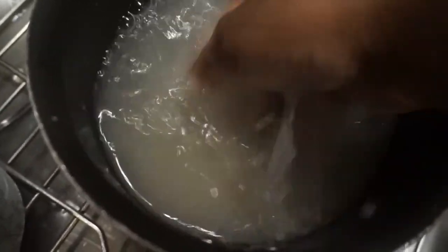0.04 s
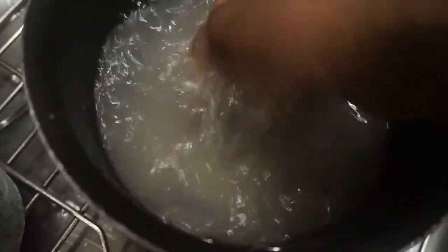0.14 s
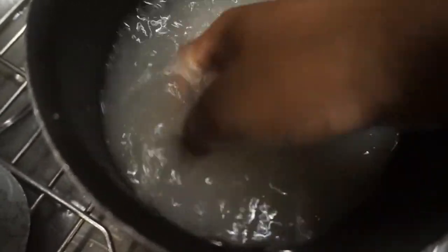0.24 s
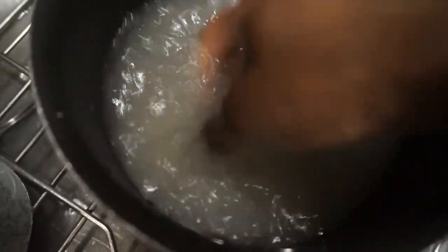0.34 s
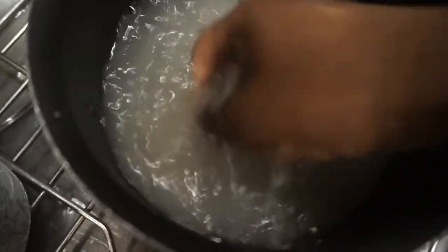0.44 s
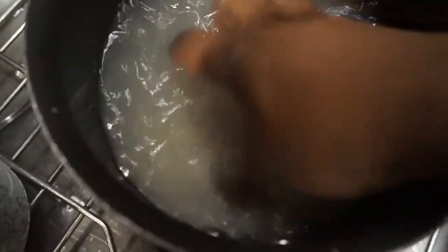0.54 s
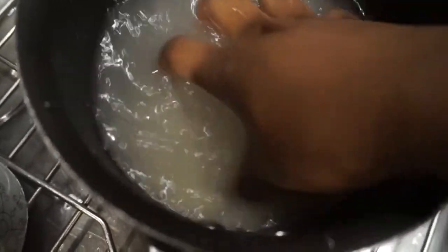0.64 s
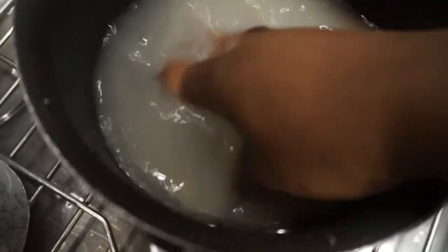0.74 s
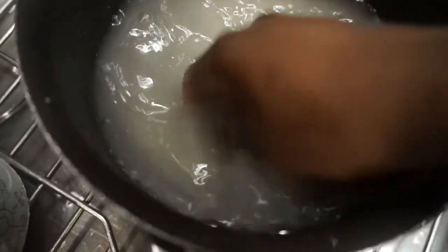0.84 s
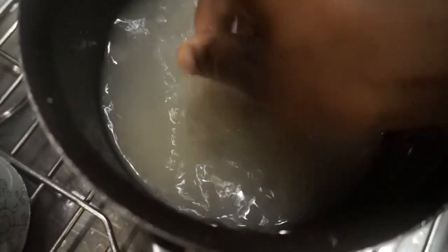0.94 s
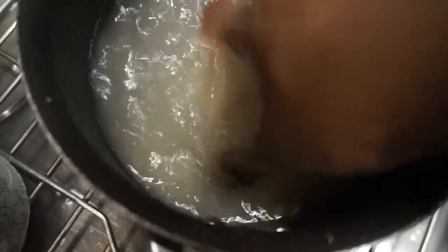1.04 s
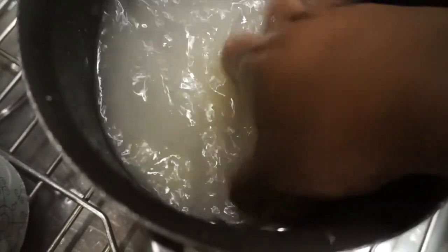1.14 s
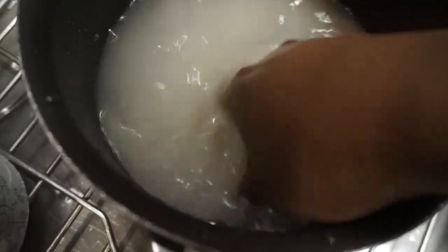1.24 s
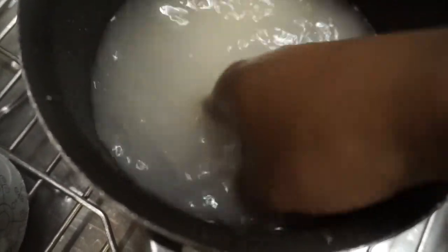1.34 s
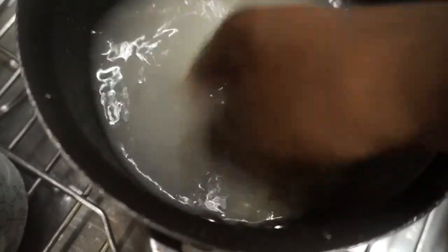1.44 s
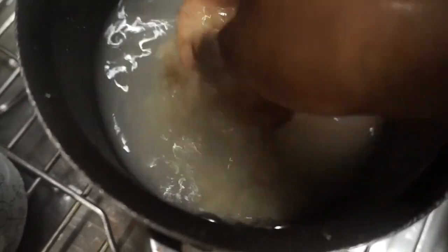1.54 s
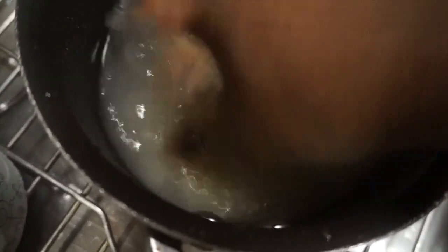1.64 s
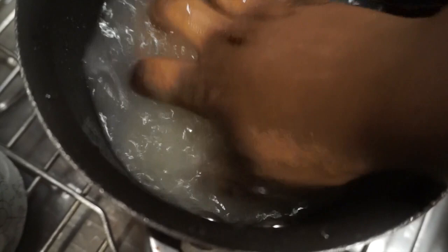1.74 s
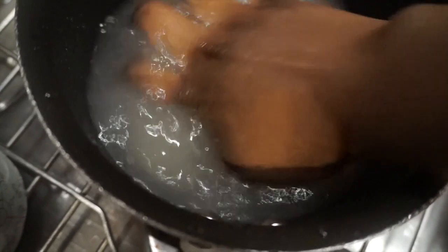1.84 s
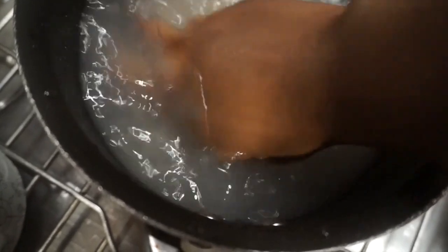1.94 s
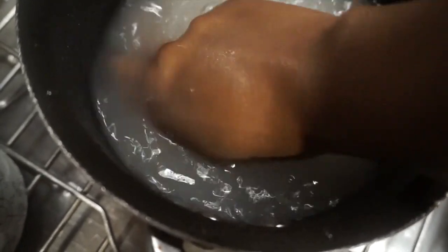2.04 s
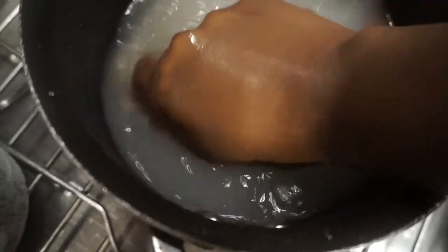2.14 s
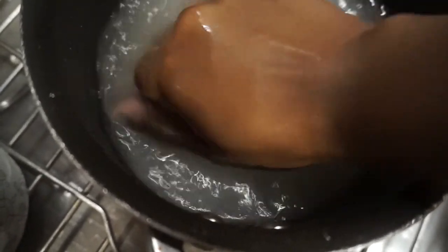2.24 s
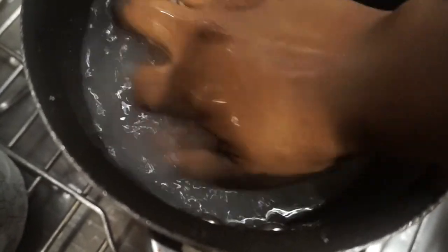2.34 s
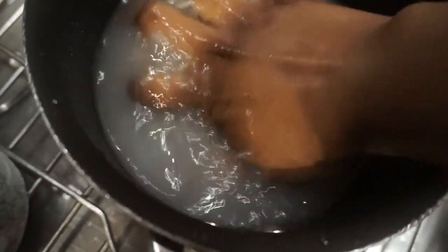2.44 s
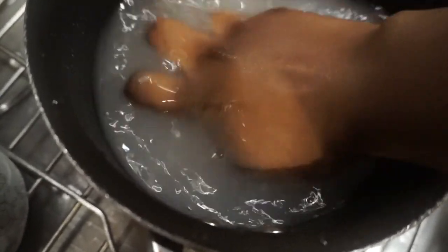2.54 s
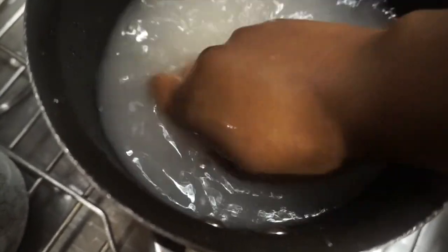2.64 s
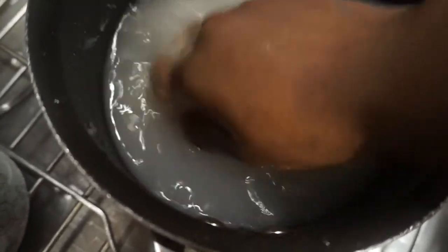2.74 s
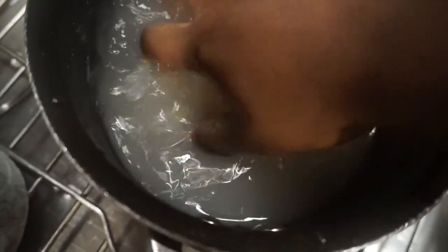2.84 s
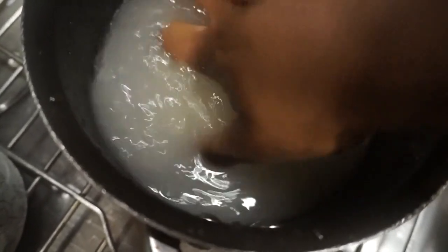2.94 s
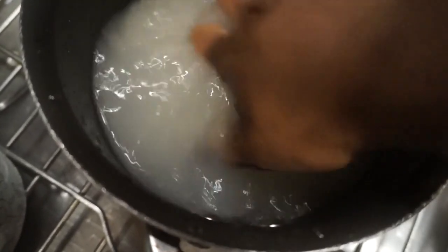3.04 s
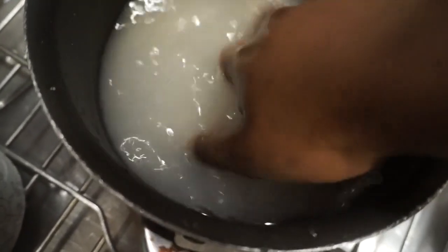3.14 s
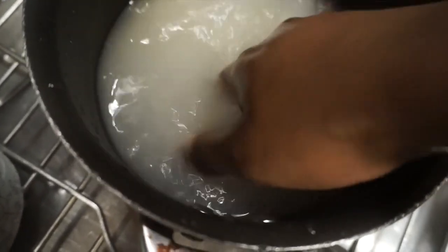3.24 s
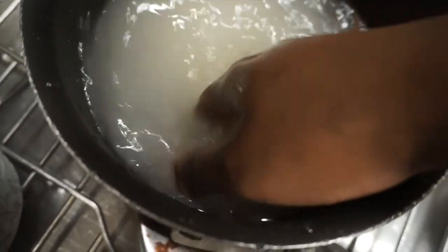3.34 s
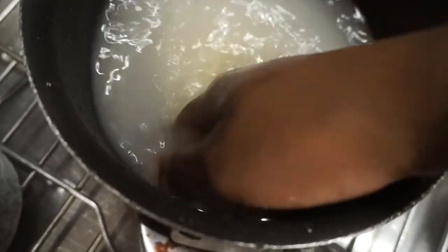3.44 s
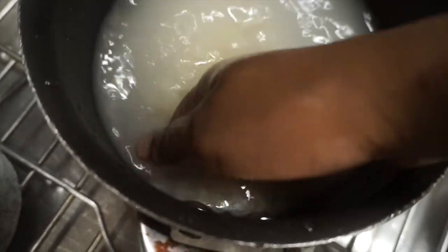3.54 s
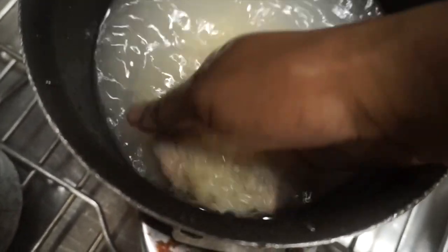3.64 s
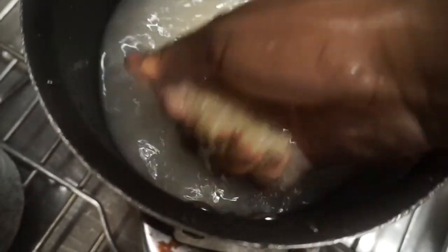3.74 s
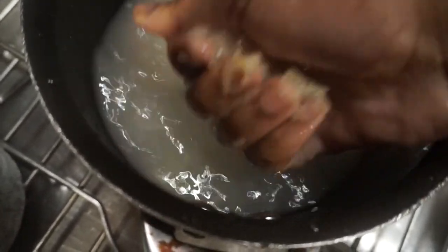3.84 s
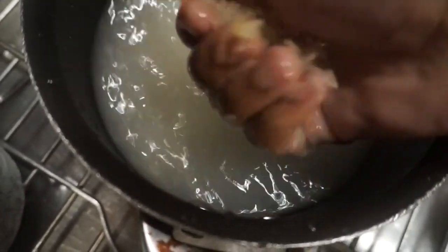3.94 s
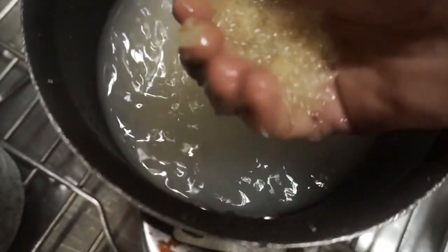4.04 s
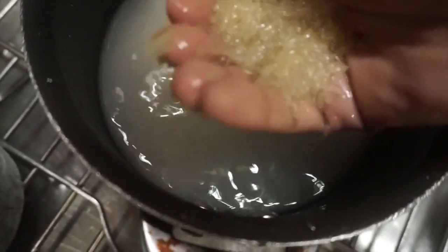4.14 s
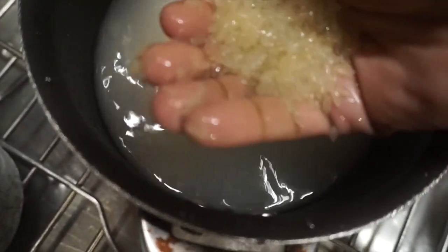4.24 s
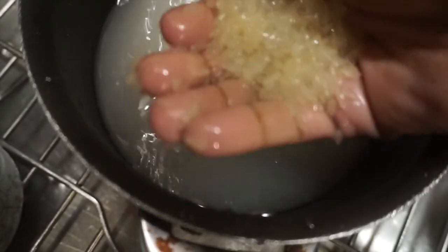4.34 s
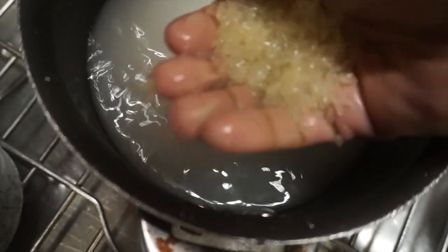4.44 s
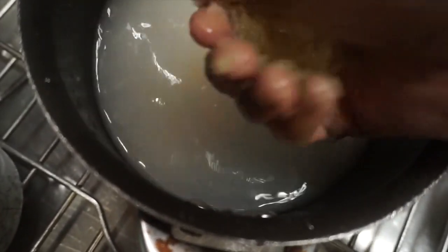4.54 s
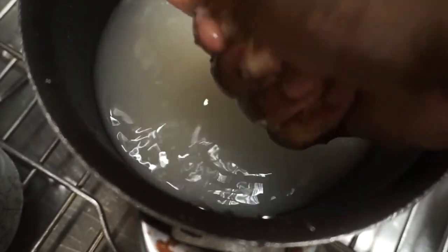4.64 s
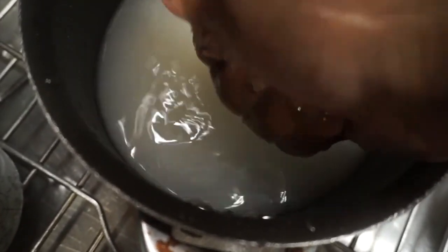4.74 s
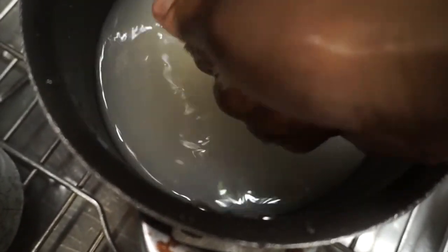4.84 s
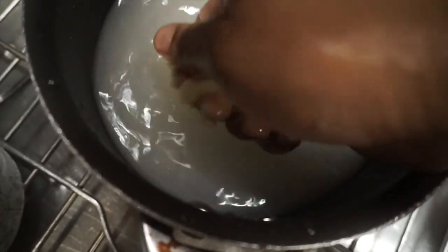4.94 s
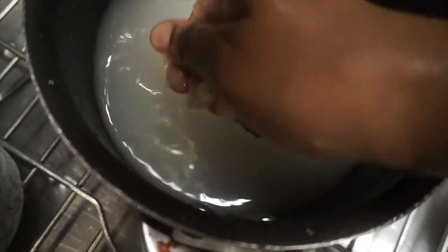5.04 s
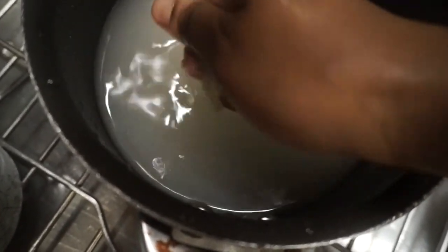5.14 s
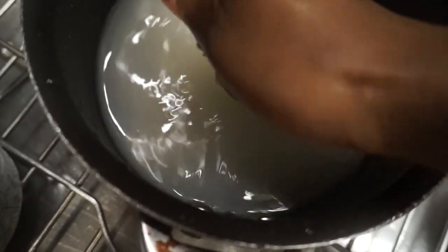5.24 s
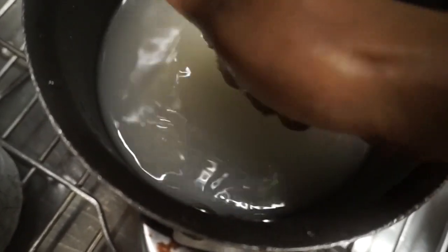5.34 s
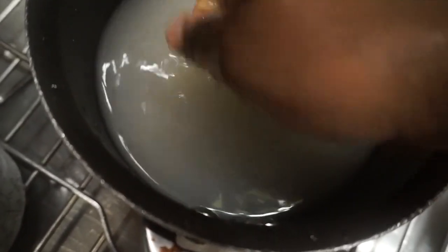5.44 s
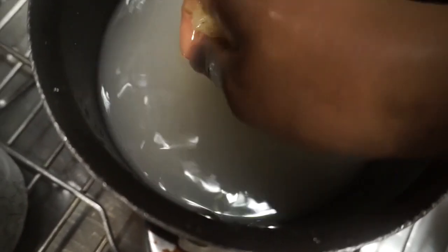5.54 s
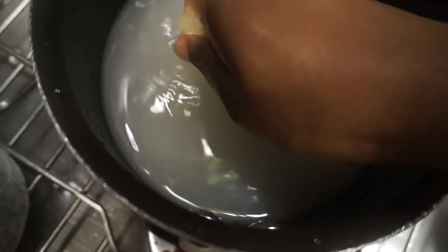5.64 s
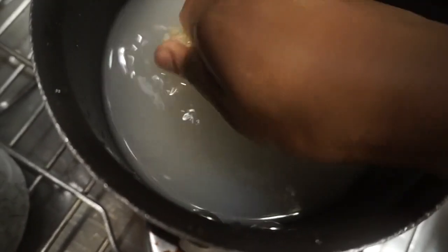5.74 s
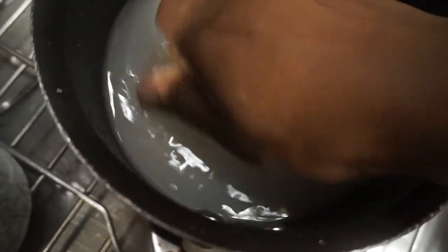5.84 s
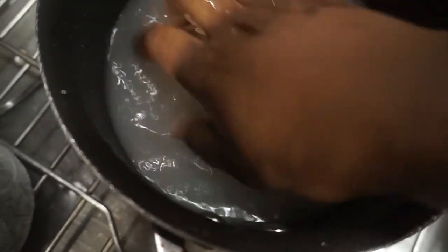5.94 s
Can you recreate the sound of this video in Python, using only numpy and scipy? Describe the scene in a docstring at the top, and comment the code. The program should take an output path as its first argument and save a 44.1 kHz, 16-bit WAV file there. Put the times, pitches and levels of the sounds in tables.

```python
"""Washing rice in a metal pot

A quiet kitchen with faint air and hum; a phone with two microphones sits close to a pot of water.
A hand drops water in plops (bubbles and spray); strokes grind grains, churn water and ring the pot.
Filtered noise and a low boom make the soft thuds of the hand; wet films snap in short noise ticks.
Then a handful is lifted, drips back and is rubbed gently between the fingers."""
import sys
import numpy as np
from scipy import signal
from scipy.fft import rfft, irfft, next_fast_len
from scipy.io import wavfile

SR = 44100
rng = np.random.default_rng(int(sys.argv[2]) if len(sys.argv) > 2 else 0)


def wav_record(signal):
    """Record a signal, one row per channel, as 16-bit PCM in the file named by sys.argv[1]."""
    frames = np.transpose(np.atleast_2d(signal))
    bounded = np.clip(frames, -1, 1)
    # unit amplitude maps onto the largest positive 16-bit level
    quanta = np.round(bounded * 32767).astype(np.int16)
    wavfile.write(sys.argv[1], SR, quanta)


N = 264143
TIME = np.arange(N) / SR
# padded transform length and its frequencies [Hz]
SIZE = 2 * next_fast_len(N // 2 + SR // 2, True)
FREQ = np.maximum(np.fft.rfftfreq(SIZE, 1 / SR), 1)

# Levels in the tables are relative: each source also has its own gain.
# In every movement, rise and fall are the times from the peak to ARCH_DB below it.

# room air spectrum: (frequency [Hz], level per Hz [dB])
KITCHEN_AIR = [(15, -40.5), (25, -30), (48, -10), (87, -8), (190, 2), (285, -15), (489, -22), (818, -16.5),
               (936, -27.5), (1130, -26), (1260, -27), (4030, -32.5), (16000, -38.5)]
# appliance hum: (frequency [Hz], rms level [dB])
APPLIANCE_HUM = [(118.4, -70), (194, -80.5)]
# hand bumping the bottom: (peak time [s], rise [s], fall [s], level [dB])
BUMPS = [(0.12, 0.18, 0.17, -55), (0.735, 0.033, 0.14, -45), (0.825, 0.072, .12, -47),
         (0.96, 0.071, 0.11, -48), (1.21, 0.069, 0.15, -50), (1.85, 0.11, 0.75, -59.5),
         (2.68, 0.053, 0.09, -50.5), (3.15, 0.037, 0.14, -47), (3.29, 0.12, 0.16, -43.5),
         (3.50, 0.023, 0.038, -53.5), (3.78, 0.069, 0.034, -57.5)]
# soft bump spectrum: (frequency [Hz], level per Hz [dB])
THUD_SPECTRUM = [(40, -22), (75, -6.5), (110, -2.5), (150, 1), (210, 1), (290, -15.5), (400, -12.5),
                 (550, -17), (900, -41.5)]
# palm slapping the water: (time [s], level [dB])
SLAPS = [(0.966, -44), (1.829, -52)]
# slap spectrum: (frequency [Hz], level per Hz [dB])
SLAP_SPECTRUM = [(50, -5.5), (150, -0.5), (380, 14), (520, 5), (900, 1), (2000, -6), (5000, -17)]
# modes of the filled pot: (frequency [Hz], width [Hz], level [dB])
POT_MODES = [(745.4, 5.9, 13.5), (782, 20, 6.5), (1010, 10, -26), (1325, 81, -7.5), (1580, 46, -42.5),
             (2035, 110, -8.5), (2290, 24, -11), (3570, 56, -36)]
# falling water that knocks the pot: (time [s], level [dB])
KNOCKS = [(1.815, -54), (2.476, -39.5), (4.12, -51), (4.22, -31.5), (4.525, -44)]
# short pot tones as the hand drags rice: (peak time [s], rise [s], fall [s], frequency [Hz], level [dB])
POT_TONES = [(0.59, .015, 0.032, 775, -44), (0.68, 0.0086, 0.038, 758, -41), (0.79, 0.019, .025, 1340, -47),
             (0.807, 0.03, 0.047, 753, -26.5), (0.844, 0.028, 0.022, 740, -35),
             (0.93, 0.017, 0.016, 750, -51), (1.16, 0.009, 0.019, 783, -30.5),
             (1.19, 0.014, 0.021, 780, -38), (1.25, 0.044, 0.064, 749, -36.5), (1.28, .06, 0.1, 1310, -46),
             (1.36, 0.041, 0.065, 766, -48), (2.61, 0.027, 0.024, 740, -47.5),
             (2.70, 0.039, 0.042, 745, -42), (2.848, 0.013, 0.027, 806, -43),
             (2.89, 0.018, 0.052, 785, -42), (3.14, 0.018, 0.019, 780, -54),
             (3.205, 0.015, 0.023, 775, -50), (3.25, .015, 0.02, 800, -43), (3.262, 0.08, 0.019, 1308, -39),
             (3.29, 0.011, .02, 750, -43), (3.345, 0.021, .04, 785, -43), (3.42, 0.013, 0.034, 795, -44),
             (3.49, .03, 0.029, 805, -50)]
# air between palm, water and wall: (frequency [Hz], width [Hz], level [dB])
CAVITY_MODES = [(1096, 67, -7.5), (1277, 100, 4), (1570, 40, -4.5), (1840, 70, -8), (2120, 120, -1),
                (2320, 90, -2)]
# hollow of the closing hand: (peak time [s], rise [s], fall [s], frequency [Hz], width [Hz], level [dB])
HAND_HOLLOWS = [(0.80, 0.047, 0.014, 2410, 500, -46), (1.30, 0.019, 0.083, 2410, 395, -47),
                (3.22, 0.077, 0.059, 2200, 506, -55.5), (5.115, 0.061, 0.084, 2050, 204, -65.5),
                (5.24, 0.017, 0.025, 3180, 404, -62), (5.30, 0.048, .04, 2190, 170, -67),
                (5.70, .05, 0.047, 2930, 329.3, -49), (5.975, 0.056, .04, 2260, 400, -50)]
# presses of the fist: (peak time [s], rise [s], fall [s], level [dB])
FIST_PRESSES = [(5.715, 0.027, 0.047, -58), (5.98, 0.018, .03, -54)]
# soft body of rice in the palm: (frequency [Hz], level per Hz [dB])
KNEAD_SPECTRUM = [(400, -8), (750, -3), (1200, -6), (1800, -13), (3500, -30)]
# films snapping between the fingers: (time [s], level [dB], extra top treble [dB])
FILM_SNAPS = [(0.347, -30.5, -2), (0.411, -39, 8.5), (0.669, -34.5, 7), (0.859, -32, -9),
              (1.017, -44.5, 6.5), (1.096, -33, 1), (1.353, -38, -9), (1.365, -37.5, 4), (1.793, -43, 18.5),
              (1.841, -37, 16), (1.873, -38, 6.5), (1.942, -42, 2), (2.194, -42.5, 3), (2.254, -52.5, 7),
              (2.476, -34, 12.5), (2.646, -54, -5), (2.93, -28, -10), (3.186, -42, 5.5), (3.538, -55.5, 6),
              (3.824, -57, -2), (3.885, -58, 1), (3.893, -46, 2), (4.052, -52, -13), (4.094, -47, -11),
              (4.12, -50, 1), (4.164, -54, -3), (4.298, -56, -13), (4.317, -55.5, -16), (4.383, -55.5, -12),
              (4.453, -67.5, 8), (4.515, -48.5, -2), (4.736, -53.5, 8.5), (4.896, -50, -2),
              (4.915, -56, -4), (4.981, -50.5, -4), (5.036, -52.5, -11), (5.305, -57.5, -9),
              (5.36, -49, -1.5), (5.379, -43.5, -16), (5.411, -49, 6), (5.452, -39, -10), (5.866, -56, -10)]
# strokes through the pot: (peak time [s], rise [s], fall [s], grain rub [dB],
# wet crackle relative to the rub [dB], churned water [dB], scrape on the pot [dB])
STROKES = [(0.02, 0.26, 0.064, -50, -3, -50.5, -52.5), (0.16, 0.11, 0.11, -42, -6.5, -46, -44),
           (0.28, 0.071, 0.072, -38.5, -5, -35, -36.5), (0.44, 0.11, 0.087, -42.5, -9, -49.5, -65),
           (0.62, 0.29, 0.12, -48, -2, -52.5, -47), (0.81, 0.13, 0.11, -45, -12, -53, -42),
           (1.00, 0.41, 0.29, -52, -3.5, -59, -56.5), (1.16, 0.052, 0.043, -43, -5, -52, -51.5),
           (1.27, 0.065, 0.12, -42, -10, -50.5, -47.5), (1.64, 0.15, 0.31, -41, -7, -42.5, -46),
           (1.86, 0.11, 0.12, -56, -16, -49.5, -78), (2.02, 0.15, 1, -61.5, -1, -67, -63.5),
           (2.35, 0.085, 0.89, -56, -10, -73, -93), (2.46, 0.062, 0.01, -51, 8, -39.5, -47),
           (2.68, 0.2, 0.073, -66.5, -20.5, -56.5, -57), (2.845, 0.014, 0.072, -54.5, 7.5, -77, -50.5),
           (2.94, 0.067, 0.05, -49.5, -9, -49, -56), (3.10, 0.05, 0.22, -50, -4.5, -65, -55.5),
           (3.24, 0.26, 0.13, -54, -34, -60, -50), (3.42, 0.23, 0.14, -53, -20, -52, -53.5),
           (3.69, 0.22, 0.13, -59, -11, -63, -64.5), (3.87, 0.064, 0.16, -64.5, -9, -65.5, -96.5)]
# squeezes of the lifted handful: (peak time [s], rise [s], fall [s], grain rub [dB],
# wet crackle relative to the rub [dB])
SQUEEZES = [(4.17, 0.15, 0.1, -69.5, -2), (4.705, 0.014, 0.042, -59, 0.5), (4.97, 0.027, 0.095, -63, -1),
            (5.129, 0.035, 0.12, -56.5, -6.5), (5.317, 0.037, 0.047, -57, -16),
            (5.439, 0.075, 0.12, -56, 0), (5.695, 0.073, 0.084, -42.5, -8), (5.887, 0.031, 0.017, -48, -8),
            (5.968, 0.068, 0.029, -42.5, -2)]
# stirred water spectrum: (frequency [Hz], level per Hz [dB])
WASH_SPECTRUM = [(300, -27), (600, -19.5), (900, -9), (1300, 10), (1700, -3.5), (2400, 5.5), (3500, 1),
                 (7000, -18)]
# rubbing grains spectrum: (frequency [Hz], level per Hz [dB])
RUSTLE_SPECTRUM = [(400, -20), (900, -16), (1700, -26), (2500, -7.5), (3400, -6), (5200, -2), (6600, 3),
                   (7900, -14.5), (11000, -16), (16000, -35)]
# wet film spectrum: (frequency [Hz], level per Hz [dB])
CRACKLE_SPECTRUM = [(2000, -17.5), (5000, 1.5), (6700, 3.5), (8200, 1), (10500, -1), (13000, -1),
                    (16000, -8)]
# water falling or closing over the hand: (time [s], bubble pitch [Hz], bubble level [dB],
# ring time constant [ms], pitch climb [share], spray level [dB])
PLOPS = [(0.096, 668, -41.5, 34, 0.31, -56.5), (0.110, 1430, -27.5, 4.9, -0.18, -27),
         (0.147, 5500, -41, 1.2, 0, -19), (0.153, 3404, -26, 5.9, -0.086, -15.5),
         (0.191, 854, -27, 2.5, 0.0047, -30.5), (0.195, 3780, -19.5, 3.4, 0.04, -27.5),
         (0.230, 1650, -30, 7.7, -0.085, -38), (0.238, 3190, -30, 2.7, -0.026, -28),
         (0.241, 2340, -25.5, 7.7, 0.32, -45), (0.254, 1310, -28, 2.4, 0, -40.5),
         (0.256, 2120, -26.5, 4.1, -0.095, -31), (0.265, 837, -16, 2.5, -0.031, -32.5),
         (0.278, 852, -20.5, 5.2, 0.18, -34), (0.272, 1135, -25, 5.2, 0.022, -34),
         (0.282, 3450, -29, 2.7, 0.14, -20), (0.287, 1170, -23, 3, 0.2, -27.5),
         (0.294, 3600, -31, 2.5, -0.075, -29), (0.3053, 3960, -26, 1.5, 0.035, -23.5),
         (0.319, 4800, -30, 2.5, -0.0029, -21.5), (0.331, 4900, -26.5, 1.2, 0, -25.5),
         (0.329, 2630, -50, 4.2, 0.21, -40.5), (0.3482, 1150, -19, 1.1, 0.15, -25.5),
         (0.368, 906, -11, 3.8, 0.27, -24), (0.380, 1160, -27.5, 5, 0.1, -48),
         (0.411, 4420, -30, 1.7, 0, -35), (0.424, 840, -41, 6.8, 0.18, -25),
         (0.425, 2100, -38.5, 3, 0.023, -37), (0.435, 4694, -37, 2, 0, -24),
         (0.4685, 3250, -20.5, 0.67, -0.24, -30), (0.484, 4700, -31, 2.3, -0.091, -23.5),
         (0.51, 2037, -31.5, 5.1, 0.0044, -44), (0.513, 1010, -29, 4.4, -0.073, -31.5),
         (0.549, 5600, -41, 1.5, 0, -25.5), (0.566, 4730, -35, 3.3, -0.19, -25),
         (0.566, 1130, -36, 1.7, 0.17, -46), (0.597, 2400, -30.5, 0.87, 0.034, -46),
         (0.6526, 2240, -33.5, 6.2, -0.056, -27.5), (0.844, 1370, -38, 6.5, 0.2, -55),
         (0.864, 1056, -42, 8.3, -0.021, -55), (0.968, 6000, -38, 1, 0.054, -23.5),
         (0.972, 1385, -30.5, 0.84, -0.15, -24), (1.008, 6000, -34, 2.2, -0.12, -40),
         (1.094, 1860, -41.5, 5.6, 0, -31), (1.111, 7050, -26, 0.44, 0.094, -30),
         (1.1404, 2590, -21, 1.1, 0.39, -18.5), (1.141, 4750, -33, 2, -0.15, -40),
         (1.161, 3340, -38, 2.2, 0, -31), (1.3668, 5940, -41, 2.2, 0.0052, -48),
         (1.477, 1270, -40, 3.1, 0.13, -27.5), (1.536, 1235, -28, 4.7, 0.23, -38.5),
         (1.538, 2060, -34.5, 2.9, -0.012, -42), (1.561, 3400, -35.5, 1.5, 0, -35),
         (1.569, 1230, -35, 2.8, 0.059, -44.5), (1.569, 6380, -23.5, 0.92, -0.027, -30),
         (1.586, 5168, -33, 2, -0.096, -40.5), (1.600, 6800, -24, 2, 0.035, -30),
         (1.608, 1320, -34, 3.7, 0.088, -32.5), (1.6159, 6900, -13.5, 0.32, -0.067, -23.5),
         (1.626, 2230, -20.5, 1.9, -0.023, -10), (1.629, 1220, -22, 1.7, 0.22, -42),
         (1.657, 2700, -25.5, 2.2, 0.099, -21), (1.659, 1068, -26.5, 8.3, 0.15, -25),
         (1.670, 3830, -26.5, 2.5, -0.085, -32.5), (1.671, 6240, -23, 1.9, 0.16, -13),
         (1.68, 1200, -25, 2.4, .15, -29), (1.693, 3640, -32, 1.6, .05, -34),
         (1.709, 2110, -32.5, 3.6, 0.078, -40.5), (1.725, 4270, -31, 3.8, 0.086, -24.5),
         (1.774, 1623, -30, 5, 0.071, -38), (1.782, 1780, -33, 4.1, 0.16, -43.5),
         (1.789, 3860, -33, 2.5, -0.024, -33.5), (1.7928, 1985, -27, 4.3, 0.17, -31.5),
         (1.805, 3970, -33, 2.3, -0.038, -41.5), (1.816, 730, -35, 5, -0.17, -29.5),
         (1.838, 2305, -15.5, 1.5, 0.31, -14), (1.846, 1265, -28, 2, 0.1, -24),
         (1.849, 2800, -15, 0.65, 0.16, -10.5), (1.873, 1375, -39, 6.7, -0.082, -40.5),
         (1.897, 2110, -39, 4, -0.083, -55), (1.905, 2750, -39, 2.8, .1, -56.5),
         (1.943, 2040, -35, 3.7, 0.075, -36.5), (1.9907, 1490, -30.5, 9.4, 0.28, -26.5),
         (1.996, 2890, -35, 3.6, -0.08, -37.5), (2.002, 2190, -37, 4, -0.08, -37.5),
         (2.0188, 1227, -20, 8.2, -0.079, -24), (2.018, 4310, -31, 1.6, -0.12, -21.5),
         (2.020, 2160, -24, 2.6, 0.16, -39), (2.021, 1605, -21, 3.3, 0.057, -30),
         (2.043, 1210, -30.5, 9.8, -0.03, -34), (2.122, 1910, -44, 2.2, 0, -45),
         (2.141, 1350, -32, 1.7, -0.22, -31), (2.1432, 1900, -26, 1.4, -0.098, -24),
         (2.148, 1674, -29.5, 3.9, 0.16, -36), (2.144, 6670, -27.5, 1.4, -0.00096, -44.5),
         (2.314, 2570, -42.5, 5.2, -0.099, -33.5), (2.406, 1304, -34.5, 7.8, 0.17, -40.5),
         (2.425, 3364, -20, 1.9, -0.056, -31.5), (2.425, 1510, -28.5, 1.5, 0.33, -39.5),
         (2.4498, 1875, -24, 3.9, 0.2, -21.5), (2.450, 2770, -19.5, 0.95, -0.028, -25.5),
         (2.449, 1190, -30.5, 1.5, 0.14, -38), (2.474, 4500, -17, 0.63, -0.25, -16.5),
         (2.472, 3020, -28, 2, -0.085, -30), (2.472, 1170, -27.5, 5.7, 0.062, -45),
         (2.484, 1435, -20, 0.68, 0.24, -21), (2.503, 6300, -36, 1.5, 0, -26.5),
         (2.586, 1310, -45.5, 16, -0.15, -40), (2.666, 1870, -48, 3.6, 0.011, -65),
         (2.731, 4160, -32.5, 1.6, -0.23, -37.5), (2.91, 1780, -36.5, 5.9, 0.061, -32),
         (2.912, 2200, -45, 3.3, 0, -54), (2.93, 1630, -43, 5, -0.13, -48), (2.927, 6640, -67, 2, 0, -29),
         (2.959, 1636, -39, 4.2, -0.3, -58), (3.134, 6720, -35.5, 2.6, -0.099, -48),
         (3.338, 1130, -25.5, 5.7, -0.31, -27.5), (3.355, 2720, -36.5, 3, -0.27, -37),
         (3.4018, 2430, -22, 5.6, -0.034, -24.5), (3.4095, 1420, -30, 4.4, 0.3, -45),
         (3.416, 2280, -30.5, 4.6, -0.13, -54), (3.421, 1686, -27.5, 5.5, 0.034, -52),
         (3.426, 1985, -33, 7, -0.11, -43), (3.426, 1226, -32.5, 8.1, 0.12, -23.5),
         (3.428, 6960, -28.5, 2, -0.0054, -59.5), (3.475, 3613, -37, 7.3, -0.12, -28),
         (3.615, 2130, -48, 1.8, -0.1, -41), (3.714, 1230, -50, 2.7, -0.19, -50),
         (3.765, 1500, -51, 4.3, 0.23, -49), (3.772, 1950, -54.5, 5.2, -.1, -59),
         (3.819, 3230, -53.5, 4.3, 0, -58), (3.804, 5740, -49.5, 2.4, 0.052, -62),
         (3.867, 6718, -44.5, 1.5, 0, -41), (3.893, 6900, -26.5, 0.4, 0.091, -43),
         (4.002, 3610, -29.5, 4, -0.14, -28), (4.094, 7220, -37.5, 1.3, 0, -48),
         (4.096, 2770, -47.5, 1.3, 0.049, -50.5), (4.119, 2640, -38.5, 2, 0.2, -43),
         (4.142, 4900, -37.5, 2.6, 0.095, -41.5), (4.152, 4830, -39, 1.5, -0.059, -56),
         (4.206, 6240, -45, 2, 0, -47), (4.22, 2223, -26.5, 3.2, -0.094, -25),
         (4.219, 2840, -28, 1.5, 0, -55), (4.232, 4750, -35, 2.4, -0.099, -40),
         (4.5223, 2850, -24.5, 2.1, 0, -28.5), (4.524, 3520, -38.5, 1.5, 0.047, -54),
         (4.638, 7100, -53, 2, -0.019, -58), (4.707, 7120, -49, 1.6, 0.067, -56.5),
         (4.953, 7050, -46.5, 1.2, -0.035, -51.5), (5.011, 4260, -52, 3.4, 0.0031, -57.5),
         (5.105, 7070, -35.5, 0.48, -0.079, -55), (5.205, 6720, -42, 1.7, 0.059, -56),
         (5.369, 4540, -44, 1.8, 0, -47.5), (5.435, 4430, -35, 1.4, 0.12, -55),
         (5.4356, 7000, -31, 0.59, 0, -59), (5.514, 5730, -49, 2, -0.069, -57),
         (5.549, 6270, -37, 1.8, 0, -46), (5.574, 6270, -48, 2.2, 0.048, -56),
         (5.643, 5900, -37.5, 1.3, 0, -43), (5.876, 5560, -33.5, 1.5, -0.097, -48),
         (5.935, 5480, -20, 0.16, 0, -33), (5.952, 6050, -19.5, 0.39, 0.36, -31),
         (5.974, 2220, -34, 4.9, 0.16, -49), (5.985, 6700, -31, 1.7, -0.029, -46)]
# plop spray spectrum: (frequency [Hz], level per Hz [dB])
SPRAY_SPECTRUM = [(300, -34), (600, -20.5), (900, 3), (1500, -4), (2500, -0.5), (4500, 5.5), (6700, 7),
                  (8000, -1.5), (10500, -3.5), (12500, -5), (14500, -1), (16000, -18)]

# every movement swells and fades on one arch
ARCH_DB, ARCH_POWER = 15, 1.15
# water wrung out and grains spilled by a squeeze, relative to its rub
WRING_DB, SPILL_DB = -16.5, -28
# higher bubbles lean to the left microphone; each plop lands a little apart
LEAN_DB, LEAN_DB_PER_OCTAVE, SCATTER_DB = 0.5, 2, 0.5
PHASE_SCATTER = .6  # spread between the microphones [radians]
SMALLEST_HZ = 7030  # nominal pitch of the tiniest droplet bubble
BOOM_HZ = 149  # the whole pot on its rack
SLAP_DECAY_S = .014
BRIGHT_HZ = 9500  # the top treble of the crackle begins here
WALL_LOWEST_HZ = 1300  # the walls throw back only waves shorter than the pot's width
TOP_HZ = 16300  # upper limit of the phone


def undb(db):
    """Decibels to gain."""
    return 10 ** (np.asarray(db) / 20)


def unit(x):
    """Scale to rms 1."""
    return x / np.sqrt(np.mean(x ** 2))


def filtered(x, response):
    """Apply a frequency response."""
    return irfft(rfft(x, SIZE) * response)[..., :N]


def colour(points):
    """Causal response with unit power gain, shaped by (frequency [Hz], level [dB]) points."""
    hz, db = np.transpose(points)
    gain = unit(undb(np.interp(np.log(FREQ), np.log(hz), db)))
    # folding the cepstrum forward in time gives minimum phase
    cepstrum = irfft(np.log(gain))
    cepstrum[1:SIZE // 2] *= 2
    cepstrum[SIZE // 2 + 1:] = 0
    return np.exp(rfft(cepstrum))


def resonance(hz, width):
    """Response of one mode, gain 1 at its centre."""
    return 1 / (1 + 1j * (FREQ ** 2 - hz ** 2) / (FREQ * width))


def top_treble():
    """Smooth weight of the frequencies above BRIGHT_HZ."""
    return 1 / (1 + (BRIGHT_HZ / FREQ) ** 8)


def add(track, start, sound):
    """Mix a sound into a track at a time in seconds."""
    i = max(int(start * SR), 0)
    part = track[..., i:i + sound.shape[-1]]
    part += sound[..., :part.shape[-1]]


def pan(db):
    """Left and right gains for a level difference; positive leans left."""
    return undb(np.array([[db], [-db]]) / 2)


def wander(step_s):
    """Random drift in straight lines between normal draws step_s apart."""
    knots = np.arange(0, N / SR + step_s, step_s)
    return np.interp(TIME, knots, rng.standard_normal(len(knots)))


def arches(moves):
    """Gain over time of overlapping movements (peak time [s], rise [s], fall [s], level [dB])."""
    power = np.zeros(N)
    for peak, rise, fall, db in moves:
        away = np.maximum((peak - TIME) / rise, (TIME - peak) / fall)
        near = away < 5
        power[near] += undb(db - ARCH_DB * away[near] ** ARCH_POWER) ** 2
    return np.sqrt(power)


def clicks(rate, spread_db):
    """Random tiny contacts (rate per second), many weak and a few strong; rms 1."""
    size = undb(spread_db * np.minimum(rng.exponential(size=N), 4))
    return unit((rng.random(N) < rate / SR) * size * rng.choice([-1, 1], N))


def grains(rate, spread_db, width=0.63, scratch=0.0002):
    """Grain contacts, each a very short noise scratch, partly alike at the two microphones."""
    decay = np.exp(-2 / (scratch * SR))
    energy = clicks(rate, spread_db) ** 2 + 1e-12
    size = np.sqrt(signal.lfilter([1], [1, -decay], energy))
    mid, side = size * rng.standard_normal((2, N))
    return unit(np.array([mid + width * side, mid - width * side]))


def bubble(hz, ring, climb, phase=0):
    """A trapped air pocket swells, then fades as its pitch climbs while surfacing, or falls."""
    t = np.arange(int(7 * ring * SR) + 100) / SR
    swell = 1 - np.exp(-(t / (0.0013 + 1.5 / hz)) ** 2)
    shape = swell * np.exp(-t / ring)
    pitch = hz * (1 + climb * (np.tanh(t / (4 * ring)) - .25))
    return shape / shape.max() * np.sin(2 * np.pi * np.cumsum(pitch) / SR + phase)


def froth(rate, low_hz, high_hz, cycles, spread_db, rise=0.037):
    """A swarm of small bubbles (rate per second) all over the pot; rms 1."""
    out = np.zeros((2, N))
    for when, size, strength, side in rng.random((int(rate * N / SR), 4)):
        hz = low_hz * (high_hz / low_hz) ** size
        gain = undb(-spread_db * np.log(strength + 0.0026)) * pan(14 * (side - .5))
        add(out, when * N / SR, gain * bubble(hz, cycles / hz, rise))
    return unit(out)


def kitchen(air_db=-59.5, wide_hz=900):
    """Faint steady air and appliance hum; the lowest air noise is alike at both microphones."""
    mid, side = filtered(rng.standard_normal((2, N)), colour(KITCHEN_AIR))
    side = filtered(side, 1.5 * FREQ / (FREQ + wide_hz))
    hum = sum(undb(db) * np.sqrt(2) * np.sin(2 * np.pi * hz * TIME) for hz, db in APPLIANCE_HUM)
    return undb(air_db) * (mid + np.array([side, -side])) + hum


def echoes(x, delay, t60, top_hz):
    """A dense fading tail of reflections (delay and t60 in s), different at each microphone."""
    t = np.arange(SR // 2) / SR
    tail = rng.standard_normal((2, len(t))) * undb(-60 * t / t60) * (t > delay)
    tail /= np.sqrt(np.sum(tail ** 2, axis=1, keepdims=True))
    return filtered(signal.fftconvolve(x, tail, axes=1)[:, :N], 1 / (1 + 1j * FREQ / top_hz))


def thuds(thud_db=-4, boom_db=-1, boom_waver=.05, boom_flutter_db=2):
    """The hand bumps softly along the bottom, booming the pot, and now and then slaps the water."""
    rumble = filtered(grains(rate=1000, spread_db=2.5, width=0.11), colour(THUD_SPECTRUM))
    bend, flutter = wander(.02), wander(.02)
    turns = np.cumsum(BOOM_HZ * (1 + boom_waver * bend)) / SR
    boom = undb(boom_db + boom_flutter_db * flutter) * np.sin(2 * np.pi * turns)
    push = np.zeros(N)
    for start, db in SLAPS:
        add(push, start, undb(db) * np.exp(-TIME[:SR // 5] / SLAP_DECAY_S))
    slaps = filtered(push * rng.standard_normal(N), colour(SLAP_SPECTRUM))
    return arches(BUMPS) * (undb(thud_db) * rumble + boom) + slaps


def pot(x):
    """The wall and the hollow of the pot ring as a sum of modes."""
    return filtered(x, sum(undb(db) * resonance(hz, width) for hz, width, db in POT_MODES))


def pot_contact(drag, knock_db=43, soft_hz=900):
    """Dragged grains and soft knocks set the pot ringing; rocking water bends the scraped pitch."""
    pushes = np.zeros(N)
    for start, db in KNOCKS:
        add(pushes, start, undb([db + knock_db]))
    # water cushions the blow, so it feeds mainly the lowest modes
    knocks = pot(filtered(pushes, resonance(soft_hz, soft_hz / 3)))
    rocking = np.interp(TIME, np.linspace(0, N / SR, 130), .028 * rng.standard_normal(130))
    scrape = unit(pot(clicks(rate=4200, spread_db=2.5)))
    # reading the scrape at a wavering speed bends its pitch
    scrape = np.interp(np.cumsum(1 + rocking), np.arange(N), scrape, period=N)
    return knocks + drag * scrape


def pot_tones(tone_db=-2.5, waver=.018, flutter_db=2.5):
    """The dragging hand makes one pot mode swell for a moment, bent by the rocking water."""
    bend, flutter = wander(.013), wander(.013)
    turns = np.cumsum(1 + waver * bend) / SR
    tones = np.zeros(N)
    for peak, rise, fall, hz, db in POT_TONES:
        tones += arches([(peak, rise, fall, db)]) * np.sin(2 * np.pi * hz * turns)
    return undb(tone_db + flutter_db * flutter) * tones


def cavity(cavity_db=-7, waver=.008):
    """Grains ring the air under the pressing palm, whose changing shape bends the pitch."""
    rub = clicks(rate=3000, spread_db=2.0)
    modes = sum(undb(db) * resonance(hz, width) ** 2 for hz, width, db in CAVITY_MODES)
    ring = unit(filtered(rub, modes))
    shape = np.interp(TIME, np.linspace(0, N / SR, 90), rng.standard_normal(90))
    bent = np.interp(np.cumsum(1 + waver * shape), np.arange(N), ring, period=N)
    return undb(cavity_db) * arches(BUMPS) * bent


def hollows():
    """Grains rubbed in the half-closed hand ring its hollow; a tighter fist rings higher."""
    rub = grains(rate=2700, spread_db=-1.5)
    out = np.zeros((2, N))
    for peak, rise, fall, hz, width, db in HAND_HOLLOWS:
        ring = unit(filtered(rub, resonance(hz, width) ** 2))
        out += arches([(peak, rise, fall, db)]) * ring
    return pan(db=2.5) * out


def kneading():
    """Wet rice packed in the fist gives a dull crunch of filtered grain contacts."""
    crunch = filtered(grains(rate=1300, spread_db=1.0), colour(KNEAD_SPECTRUM))
    return arches(FIST_PRESSES) * crunch


def snaps(snap_db=1.5, decay_s=0.0033, lean_db=1.0):
    """A film of water tears in one toneless tick; thinner films are brighter."""
    size = np.zeros((2, 1, N))
    for start, db, top_db in FILM_SNAPS:
        levels = undb([[[db + snap_db]], [[db + snap_db + top_db]]])
        add(size, start, levels * np.exp(-TIME[:SR // 20] / decay_s))
    mid, side = rng.standard_normal((2, N))
    body, top = size * np.array([mid + side / 2, mid - side / 2])
    # the top treble follows its own level
    tick = body + filtered(top - body, top_treble())
    return pan(lean_db) * filtered(tick, colour(CRACKLE_SPECTRUM))


def hand():
    """Gains over time with which strokes and squeezes rub, crackle, churn and scrape."""
    moves = list(STROKES)
    for *when, rub, wet in SQUEEZES:
        moves.append((*when, rub, wet, rub + WRING_DB, rub + SPILL_DB))
    return (arches((*when, rub) for *when, rub, wet, churn, scrape in moves),
            arches((*when, rub + wet) for *when, rub, wet, churn, scrape in moves),
            arches((*when, churn) for *when, rub, wet, churn, scrape in moves),
            arches((*when, scrape) for *when, rub, wet, churn, scrape in moves))


def churning(churn, froth_db=-4, wash_db=-4.0, gurgle_db=-5):
    """Stirred water seethes with small bubbles and gurgles with larger ones that chirp upward."""
    seethe = froth(rate=260, low_hz=1050, high_hz=3300, cycles=9, spread_db=3.5, rise=.15)
    gurgle = froth(rate=110, low_hz=950, high_hz=2800, cycles=16, spread_db=2.5, rise=.25)
    wash = filtered(grains(rate=1300, spread_db=3.0), colour(WASH_SPECTRUM))
    water = undb(froth_db) * seethe + undb(gurgle_db) * gurgle + undb(wash_db) * wash
    return pan(db=3.0) * churn * water


def wet_crackle(body_db=2, top_db=2):
    """Wet films crackle; the top treble comes from partly separate contacts of the same kind."""
    response = colour(CRACKLE_SPECTRUM)
    shared = filtered(grains(rate=1000, spread_db=4.6, scratch=.0006), response)
    separate = filtered(grains(rate=1000, spread_db=4.6, scratch=.0006), response)
    body = filtered(shared, np.sqrt(1 - top_treble()))
    top = filtered(unit(separate + shared / 2), np.sqrt(top_treble()))
    return undb(body_db) * body + undb(top_db) * top


def rubbing(rub, wet, rustle_db=-0.5, fizz_db=-6, patchy_db=2.0):
    """Grains rustle, tiny bubbles burst between them and wet films crackle."""
    rustle = filtered(grains(rate=1900, spread_db=4.0), colour(RUSTLE_SPECTRUM))
    fizz = froth(rate=380, low_hz=3000, high_hz=7400, cycles=5, spread_db=4.5)
    rubbed = pan(db=3.5) * (undb(rustle_db) * rustle + undb(fizz_db) * fizz)
    # clumps of rice catch and give way
    clumps = undb(patchy_db * wander(.011))
    return clumps * (rub * rubbed + wet * wet_crackle())


def splinters(hz, ring, climb, apart_octaves=.3, late_s=.011, fade_db=8, count=3):
    """A bubble sheds a few weaker ones of nearly its size just after it forms."""
    out = np.zeros((2, SR // 5))
    for size, late, side in rng.random((count, 3)):
        near_hz = hz * 2 ** (apart_octaves * (2 * size - 1))
        gain = pan(10 * (side - .5)) * undb(-fade_db * late)
        add(out, .003 + late * late_s, gain * bubble(near_hz, min(ring, .004), climb))
    return out


def lingering(hz, decay, width_hz=70):
    """A bubble's pitch hangs on unevenly between the walls, different at each microphone."""
    t = np.arange(int(7 * decay * SR) + 100) / SR
    knots = np.arange(0, t[-1] + 1 / width_hz, 1 / width_hz)
    draws = rng.standard_normal((2, 2, len(knots)))
    beating = np.array([np.interp(t, knots, re + 1j * im) for re, im in draws])
    tone = np.imag((.6 + .8 * beating) * np.exp(2j * np.pi * hz * t))
    return (1 - np.exp(-t / .002)) * np.exp(-t / decay) * tone


def spray_burst(lowest_hz, decay_s=0.005):
    """Falling water sprays a short burst of high-passed noise, partly alike on both sides."""
    t = np.arange(SR // 20) / SR
    high_pass = signal.butter(2, 0.89 * lowest_hz, "high", fs=SR, output="sos")
    shared, apart = signal.sosfilt(high_pass, rng.standard_normal((2, len(t))))
    envelope = (1 - np.exp(-(t / 0.000076) ** 2)) * np.exp(-t / decay_s)
    return envelope * np.array([shared + apart / 2, shared - apart / 2])


def plops(spray_db=-10, rise=0.088, droplet_db=-5, droplet_span_s=0.0196, droplet_cycles=6,
          linger_db=-23, linger_s=0.03, linger_hz=3500, full_ring_ms=1.0, splinter_db=-12, count=8):
    """A main bubble splinters and lingers, with spray and droplets that trap smaller bubbles."""
    bubbles, spray = np.zeros((2, N)), np.zeros((2, N))
    for start, hz, db, ring_ms, climb, burst_db in PLOPS:
        ring = ring_ms / 1000
        lean = LEAN_DB + LEAN_DB_PER_OCTAVE * np.log2(hz / 1000)
        place = pan(lean + SCATTER_DB * rng.standard_normal())
        phase = PHASE_SCATTER * rng.standard_normal() * np.array([[.5], [-.5]])
        add(bubbles, start, place * undb(db) * bubble(hz, ring, climb, phase))
        add(bubbles, start, place * undb(db + splinter_db) * splinters(hz, ring, climb))
        # below full_ring_ms, a shorter ring leaves less of its pitch behind
        linger = undb(db + linger_db) * min(1, ring_ms / full_ring_ms)
        linger_decay = linger_s * min(1, linger_hz / hz) ** 2
        add(bubbles, start, place * linger * lingering(hz, linger_decay))
        # less water makes a smaller bubble and a thinner spray
        lowest_hz = min(.9 * hz, 2400)
        add(spray, start, undb(burst_db + spray_db) * spray_burst(lowest_hz))
        for size, late, side in rng.random((count, 3)):
            small_hz = lowest_hz * (SMALLEST_HZ / lowest_hz) ** size
            # later droplets are weaker
            gain = undb(burst_db + droplet_db - 44.3 * late) * pan(16 * (side - .5))
            droplet = gain * bubble(small_hz, droplet_cycles / small_hz, rise)
            add(bubbles, start + late * droplet_span_s, droplet)
    return bubbles + filtered(spray, colour(SPRAY_SPECTRUM))


def scene(ring_db=-8, walls_db=-6, room_db=-16, lag=1.08, lowest_hz=560):
    """Water and grains sound inside the pot; its walls and the kitchen throw them back."""
    water = plops() + snaps()
    rub, wet, churn, drag = hand()
    near = water + undb(ring_db) * pot(water)
    near = near + rubbing(rub, wet) + churning(churn) + kneading()
    near = near + pot_contact(drag) + pot_tones() + hollows() + cavity()
    # bubbles and grains are too small to radiate bass
    near = filtered(near, 1 / np.sqrt(1 + (lowest_hz / FREQ) ** 10))
    # the left microphone hears the pot slightly later (lag in radians, reached in the midrange)
    left = filtered(near[0], np.exp(-1j * lag * np.tanh(FREQ / 900)))
    direct = np.array([left, near[1]])
    short_waves = filtered(near, 1 / np.sqrt(1 + (WALL_LOWEST_HZ / FREQ) ** 6))
    walls = undb(walls_db) * echoes(short_waves, delay=.001, t60=.045, top_hz=14000)
    room = undb(room_db) * echoes(near, delay=0.011, t60=0.22, top_hz=6000)
    return direct + walls + room + thuds() + kitchen()


def record(dry):
    """The phone cuts the top with a steep low-pass."""
    low_pass = signal.ellip(10, .2, 70, TOP_HZ, fs=SR, output="sos")
    return signal.sosfilt(low_pass, dry)


dry = scene()
out = record(dry)
wav_record(out)
```